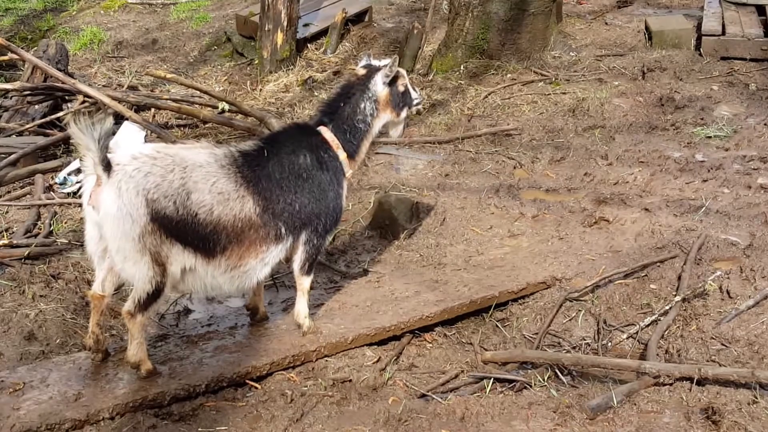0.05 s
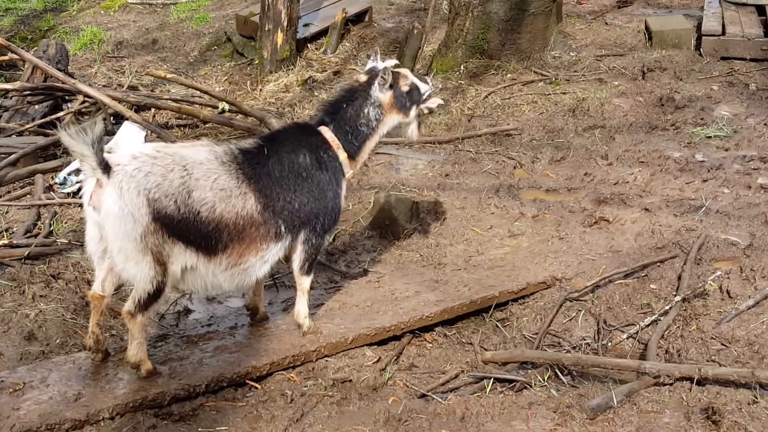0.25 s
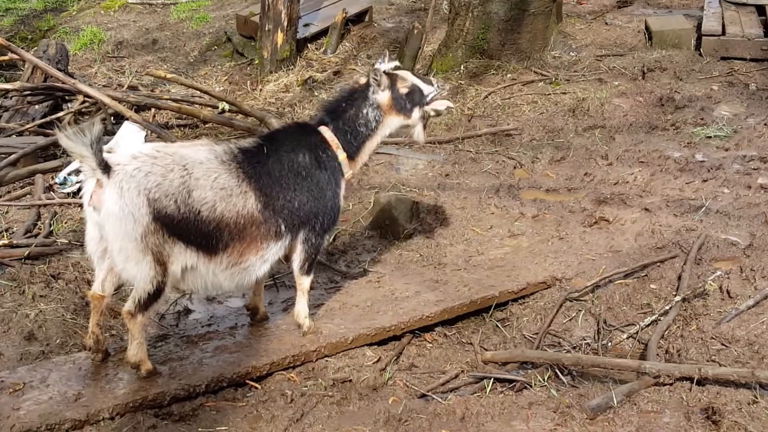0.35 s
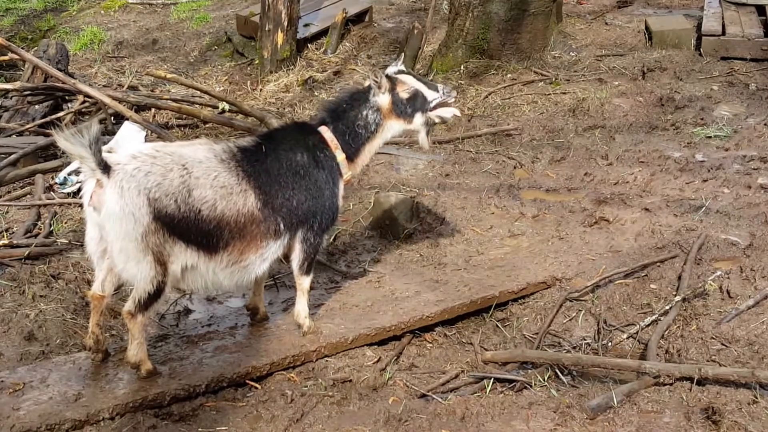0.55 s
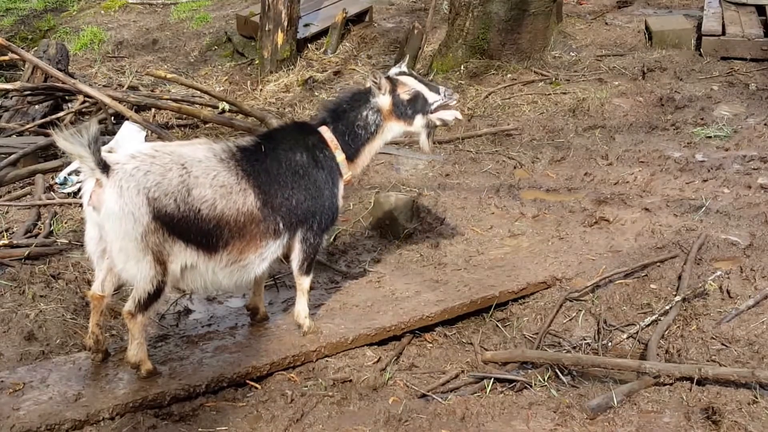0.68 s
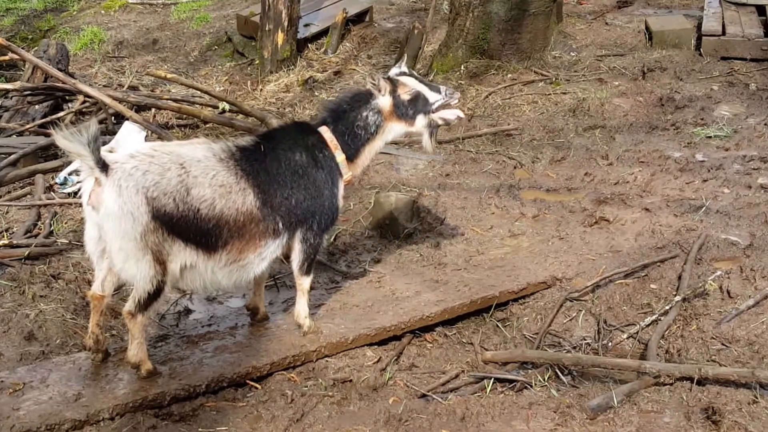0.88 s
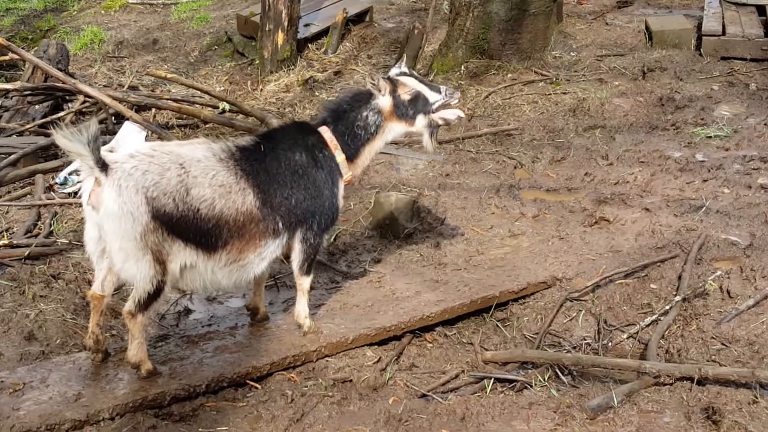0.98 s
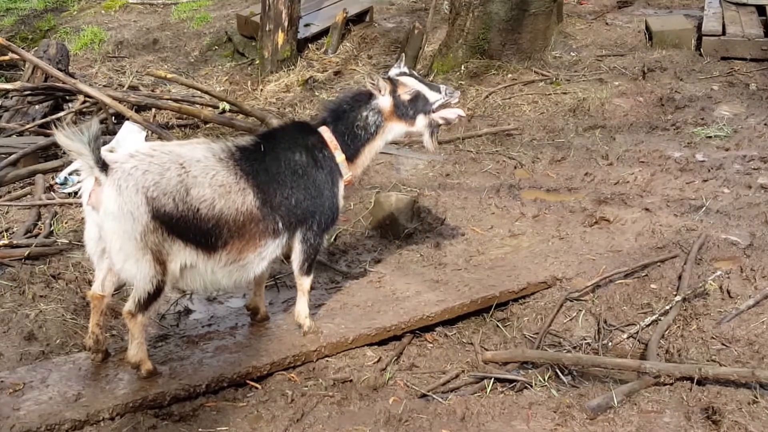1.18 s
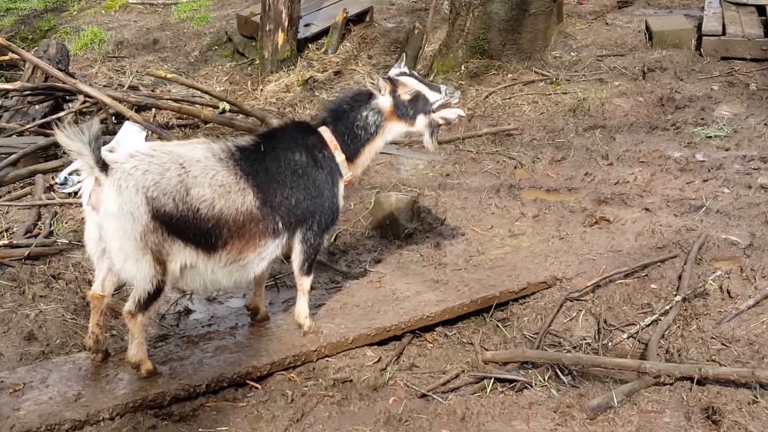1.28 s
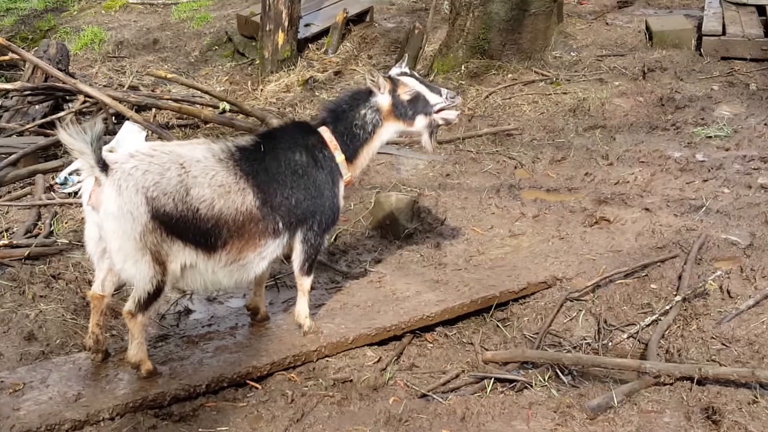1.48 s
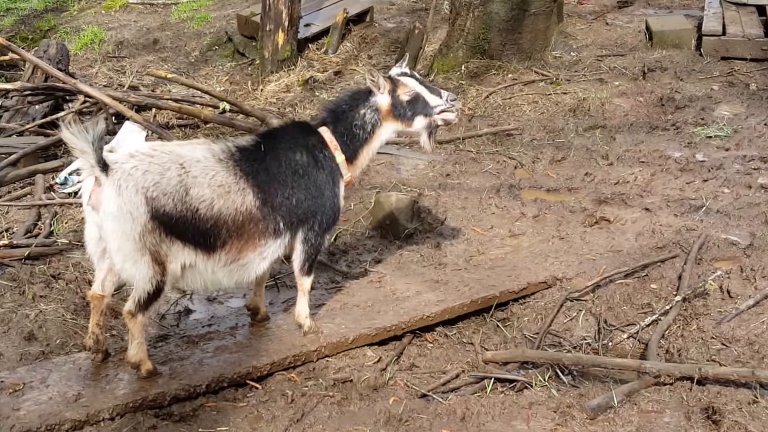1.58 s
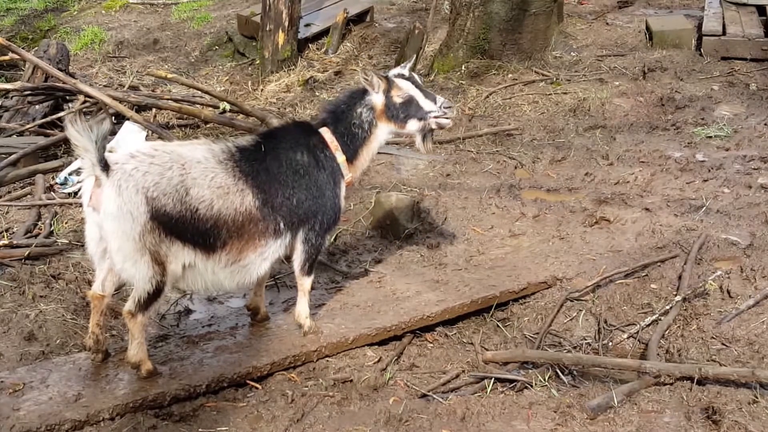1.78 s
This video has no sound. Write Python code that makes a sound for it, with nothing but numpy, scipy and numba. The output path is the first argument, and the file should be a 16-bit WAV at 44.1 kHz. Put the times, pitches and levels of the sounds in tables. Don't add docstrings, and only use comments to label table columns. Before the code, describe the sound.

One goat bleat, a few metres off in an open yard. Separate creaky pulses start near 0.14 s and catch into a loud, rough, airy scream from 0.23 to about 1.07 s. A clearer wavering nasal note follows, sagging in pitch from 1.3 s and closing with a breathy rush by 1.5 s. A thin outdoor tail fades. Faint distant hum and soft low wind buffets continue until about 2 s.

```python
import sys
import numpy as np
from scipy import signal
from scipy.fft import rfft, irfft, next_fast_len
from scipy.io import wavfile
from scipy.ndimage import uniform_filter1d
from numba import njit

SR = 44100
rng = np.random.default_rng(int(sys.argv[2]) if len(sys.argv) > 2 else 0)


def unload_audio(sound):
    columns = np.transpose(np.atleast_2d(sound))
    steps = np.round(np.clip(columns, -1, 1) * 32767)
    wavfile.write(sys.argv[1], SR, steps.astype(np.int16))


def makeup_ratio(level_db):
    decades = np.asarray(level_db, float) / 20
    return 10 ** decades


N = 81585
VOICE_STARTS_S, VOICE_ENDS_S = 0.234, 1.5
RASP_BAND_HZ = [4440, 14500]


def rms_one(x):
    return x / np.sqrt(np.mean(x ** 2) + 1e-20)


def in_time(rows):
    s, *columns = np.transpose(rows)
    return [np.interp(np.arange(N) / SR, s, c) for c in columns]


def drift(rate):
    r = np.exp(-80 * np.pi * rate / SR)
    white = rng.standard_normal(N // 40 + 2002)
    slow = signal.lfilter([1], [1, -2 * r, r * r], white)[2000:]
    return np.interp(np.arange(N) / 40, np.arange(len(slow)), rms_one(slow))


def cut(x, hz, kind, order=2):
    return signal.sosfilt(signal.butter(order, hz, kind, fs=SR, output="sos"), x)


def pulses(s, sizes):
    at = np.asarray(s)[:, None] * SR
    taps = np.floor(at).astype(int) + np.arange(-8, 9)
    window = np.cos((taps - at) * np.pi / 19) ** 2
    clicks = sizes[:, None] * np.sinc(taps - at) * window
    return np.bincount(taps.ravel(), clicks.ravel(), N + 99)[:N]


@njit
def resonate(x, hz, r):
    y = np.zeros(len(x))
    for i in range(2, len(x)):
        drive = (1 - r[i] ** 2) / 2 * (x[i] - x[i - 2])
        turn = 2 * r[i] * np.cos(2 * np.pi * hz[i] / SR)
        y[i] = drive + turn * y[i - 1] - r[i] ** 2 * y[i - 2]
    return y


# time in seconds, strength in dB.
CREAKS = [(0.142, -25), (.151, -27), (.160, -14), (.168, -30), (.177, -19), (.185, -4.5), (.194, -4.5),
          (.202, -17), (0.21, -8), (.217, -9), (.223, -0.5), (.229, -7)]
# time in seconds, pitch in Hz.
SCREAM = [(.234, 300), (.29, 318), (.335, 332), (.36, 300), (.42, 318), (.445, 326), (.47, 302), (1.0, 300),
          (1.07, 312)]
# time in seconds, pitch in Hz.
PITCH = [
    [(1.08, 317.9), (1.118, 317.2), (1.148, 344.6), (1.16, 339.3), (1.172, 335.2), (1.214, 320.3),
     (1.254, 342.8), (1.276, 328.7), (1.3, 330.6)],
    [(1.304, 334.5), (1.32, 315), (1.364, 312), (1.38, 297), (1.398, 275.7), (1.428, 221.3), (1.45, 215),
     (1.46, 206)],
]
# time in seconds, level in dB.
EFFORT = [(.11, -95), (.14, -45.5), (.185, -29), (.225, -25), (.26, -20.5), (.32, -21), (1.05, -21),
          (1.12, -17), (1.33, -19.5), (1.378, -17.5), (1.41, -36.5), (1.438, -23.5), (1.446, -36),
          (1.456, -98)]
# time in seconds, roughness 0-1, air in dB re voice.
ROUGH = [(.26, .7, -4), (.285, .1, -11), (.338, .1, -11), (.35, .9, 0), (.41, .8, -2), (.425, .12, -11),
         (.445, .12, -11), (.46, .8, 0), (.95, 1, 1), (1.07, .7, -5), (1.11, .05, -16), (1.155, .03, -20),
         (1.175, .09, -13), (1.2, .04, -18), (1.3, .07, -14), (1.33, .01, -28), (1.39, .015, -22),
         (1.42, .05, -12), (1.445, .4, -4)]


def folds():
    t = np.arange(N) / SR
    hz, = in_time(SCREAM + PITCH[0] + PITCH[1])
    rough, air_db = in_time(ROUGH)
    level_db, = in_time(EFFORT)
    hz = hz * (1 + 0.02 * rough * drift(7.4))
    turns = np.cumsum(hz * (t > VOICE_STARTS_S)) / SR
    chance = rng.standard_normal((900, 2))[:int(turns[-1]) - 2]
    s = np.interp(np.arange(len(chance)) + 1e-3, turns, t)
    i = (s * SR).astype(int)
    late_s = 0.25 * rough[i] * chance[:, 0] / hz[i]
    strength_db = 3 * np.sqrt(rough[i]) * chance[:, 1]
    beats = pulses(s + late_s, makeup_ratio(strength_db))
    beats /= np.sqrt(uniform_filter1d(beats ** 2, size=1500) + 1e-5)
    opening = cut(np.abs(beats), 500, "low")
    air = rng.standard_normal(N) * rms_one(0.4 + opening)
    creak_s, creak_db = np.transpose(CREAKS)
    creak = 10 * pulses(creak_s, makeup_ratio(creak_db - 18))
    return makeup_ratio(level_db) * (beats + makeup_ratio(air_db) * air) + creak


# time in seconds, closing 0-1.
MOUTH = [(1.0, 0.19), (1.15, 0.4), (1.3, 0.32), (1.35, 0.78), (1.39, 0.74), (1.44, 0.58)]
# time in seconds, shift as a ratio, throat in dB,
# mouth in dB.
JAW = [(.2, 1.09, 0, 0), (.28, 1.06, 0, 0), (.325, 1.11, 4, 0), (.36, 1.03, -1, 0), (.435, 1.08, 3, 1),
       (.5, 1.02, 0, 0), (.65, 1.0, -1, -1), (1.08, 1.0, 0, 2), (1.13, 1.04, -7, 4), (1.3, 1.04, -7, 4),
       (1.375, 1.03, 2, 1), (1.44, .8, -3, 2)]
# open centre in Hz, closed centre in Hz, width in Hz,
# open level in dB, closed level in dB.
TRACT = [(395, 628, 290, -23, -14), (556, 460, 232, -16, -15.5), (890, 901, 131.6, 0, -4.5),
         (1667, 1690, 267, -17.5, -6), (2072, 1895, 225, 4, -6), (2914, 3326, 220, -3, -15),
         (3494, 3606, 336, -2.5, -6.5), (3976, 3884, 310, -18.5, 6), (5670, 5590, 840, -28.5, -25),
         (8450, 8370, 820, -41, -18)]
POLARITY = [-1, 1, -1, 1, 1, 1, -1, -1, 1, -1]
MOUTH_RINGS = (5, 6, 7)
# time in seconds, level in dB.
RUSH = [(1.32, -95), (1.355, -46), (1.38, -28), (1.435, -39.5), (1.452, -39), (1.5, -100.5)]


def goat():
    source = folds()
    closing, = in_time(MOUTH)
    rush_db, = in_time(RUSH)
    jaw, jaw_db, mouth_db = in_time(JAW)
    rings = []
    for k, (open_hz, closed_hz, width_hz, open_db, closed_db) in enumerate(TRACT):
        is_throat = k == 2
        tremor = 1 + 0.008 * drift(10)
        hz = (open_hz + (closed_hz - open_hz) * closing) * tremor * (jaw if is_throat else 1)
        r = np.exp(-np.pi * width_hz * (1 + 0.35 * closing) / SR)
        once = resonate(source, hz, r)
        ring = resonate(once, hz, r) + makeup_ratio(-14) * once
        level_db = open_db + (closed_db - open_db) * closing
        level_db = level_db + jaw_db * is_throat + mouth_db * (k in MOUTH_RINGS)
        rings.append(POLARITY[k] * makeup_ratio(level_db) * ring)
    low = cut(cut(sum(rings[:8]), 278, "high"), 4550, "low", order=6)
    voice = low + sum(rings[8:]) + makeup_ratio(-45) * cut(source, RASP_BAND_HZ, "band")

    power = uniform_filter1d(low ** 2, size=350) + 1e-9
    mean_power = uniform_filter1d(low ** 2, size=2500) + 1e-9
    evening = 0.3 * (np.arange(N) > VOICE_STARTS_S * SR)
    voice = voice * (power / mean_power) ** -evening

    turbulence = rms_one(cut(rng.standard_normal(N), [3550, 5100], "band", order=1))
    rush = makeup_ratio(rush_db) * (np.arange(N) < VOICE_ENDS_S * SR) * turbulence
    return makeup_ratio(16) * voice + rush


# frequency in Hz, left minus right in dB,
# left lead in radians.
PORTS = [(800, -1, 0), (1500, -0.5, 0.98), (2250, 3, 1.13), (2420, -9, 5), (3220, -1.5, 5),
         (4510, -4.5, 5.5), (10260, -6, 23), (15370, 8, 39)]


def ports(x):
    size = next_fast_len(N + 4096)
    hz, pan_db, lead = np.transpose(PORTS)
    f = np.arange(size // 2 + 1) * SR / size
    half = makeup_ratio(np.interp(f, hz, pan_db) / 2) * np.exp(0.5j * np.interp(f, hz, lead))
    return irfft(rfft(x, size) * [half, 1 / half], size)[:, :N]


def scattered_rasp():
    level_db, = in_time(EFFORT)
    hiss = cut(rng.standard_normal((2, N)), RASP_BAND_HZ, "band")
    flicker_db = 2.5 * drift(10)
    return makeup_ratio(30 - 53.5 + level_db + flicker_db) * hiss


def yard(x):
    near_t60_s, far_t60_s = 0.04, 0.53
    t = np.arange(SR) / SR
    paths = rng.standard_normal((2, 2, SR))
    near = makeup_ratio(-13) * rms_one(paths[0] * makeup_ratio(-60 * t / near_t60_s))
    dull = cut(paths[1], 10000, "low", order=1)
    far = makeup_ratio(-20) * rms_one(dull * makeup_ratio(-60 * t / far_t60_s) * (t > 0.015))
    return signal.fftconvolve(x[None], (near + far) / np.sqrt(SR), axes=1)[:, :N]


# time in seconds, level in dB, left minus right in dB.
GUSTS = [(0.0, -59, 16), (0.23, -45.5, -3), (0.514, -43, 11.5), (0.546, -46, 1), (0.654, -50, -4.5),
         (0.694, -32, 2.5), (0.762, -53, -7.5), (0.814, -31.5, 6.5), (0.844, -47.5, -1.0), (1.04, -33, 5.5),
         (1.35, -51, 2.5), (1.472, -51, 0), (1.534, -49.5, 1), (1.566, -51, 15.5), (1.612, -44.5, 4),
         (1.71, -45.5, 7), (1.746, -43.5, -10), (1.85, -41, 2)]


def wind():
    level_db, pan_db = in_time(GUSTS)
    white = rng.standard_normal((2, N + SR))
    rumble = cut(cut(white, 65, "high"), 194, "low", order=3)[:, SR:]
    lumps_db = 4.5 * np.array([drift(12.3), drift(12.3)])
    return makeup_ratio(4 + level_db + pan_db * [[0.5], [-0.5]]) * rms_one(rumble * makeup_ratio(lumps_db))


# frequency in Hz, density in dB per Hz.
HUM = [(120, -32), (200, -23), (422, 1.5), (742, 0.5), (1560, -7), (2510, -13.5), (3750, -11.5),
       (5200, -22.5), (15500, -55.5)]


def hum():
    out = 0
    edges = 180 * 2 ** np.arange(0, 6.6, 0.5)
    white = rng.standard_normal((2, 2, N))
    hz, db = np.transpose(HUM)
    for k, (low, high) in enumerate(zip(edges, edges[1:])):
        level_db = np.interp(np.log(low * high) / 2, np.log(hz), db)
        patchy_db = 1.0 * drift(7)
        out = out + makeup_ratio(level_db + patchy_db) * cut(white[k % 2], [low, high], "band")
    return makeup_ratio(-47) * rms_one(out)


def scene():
    call, rasp = goat(), scattered_rasp()
    hiss = makeup_ratio(-69) * rng.standard_normal((2, N))
    return ports(call) + rasp + yard(call + 2 * rasp[0]) + wind() + hum() + hiss


def low_pass(x):
    return signal.sosfilt(signal.butter(12, 15700, fs=SR, output="sos"), x)


def record(dry):
    lowpass = signal.cheby2(12, 60, 15750, fs=SR, output="sos")
    mix = signal.sosfilt(lowpass, dry)
    return low_pass(mix)


dry = scene()
out = record(dry)
unload_audio(out)
```